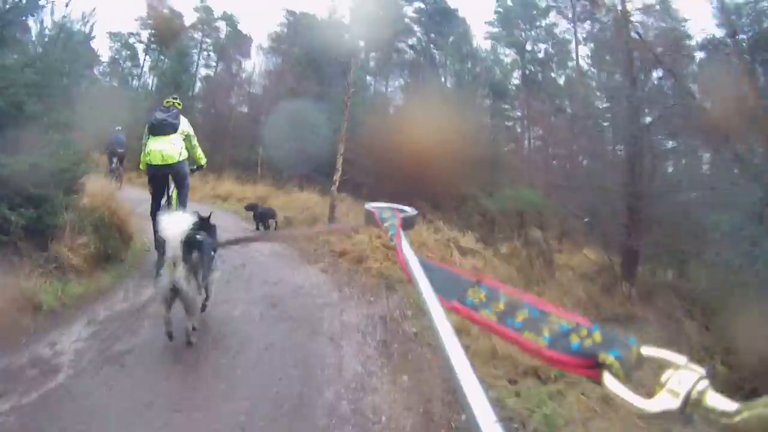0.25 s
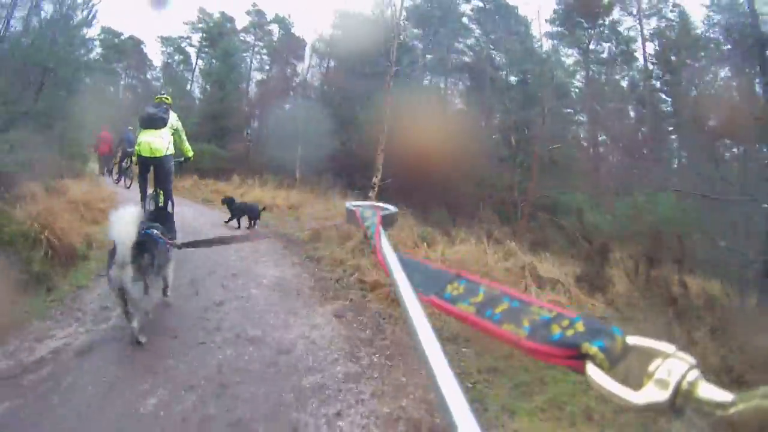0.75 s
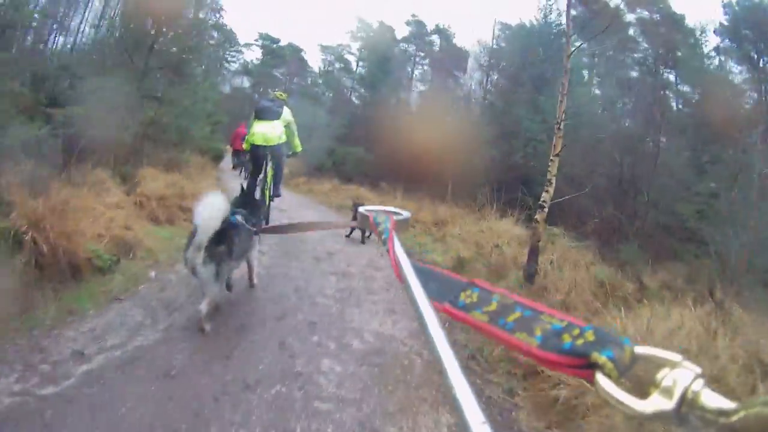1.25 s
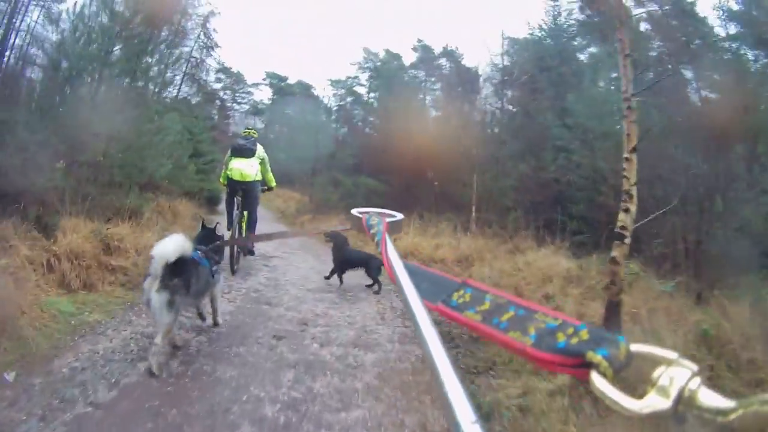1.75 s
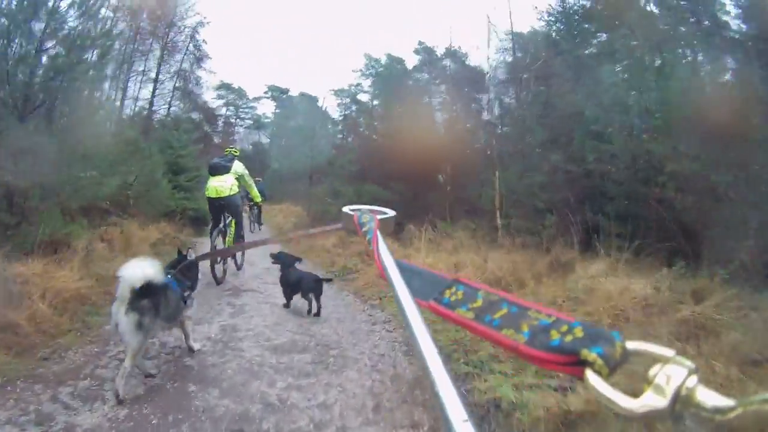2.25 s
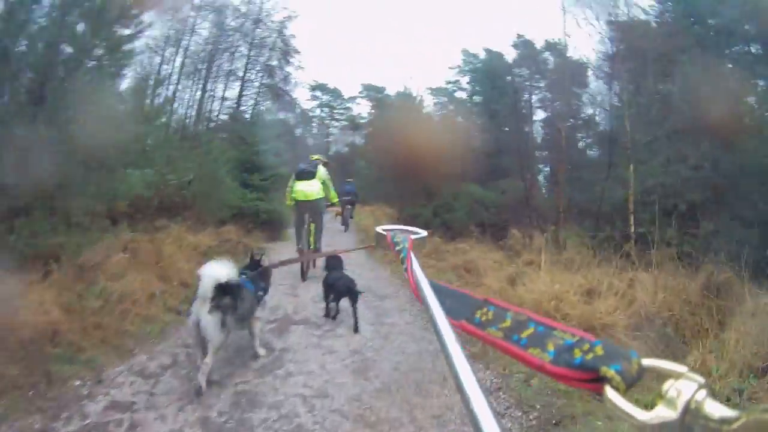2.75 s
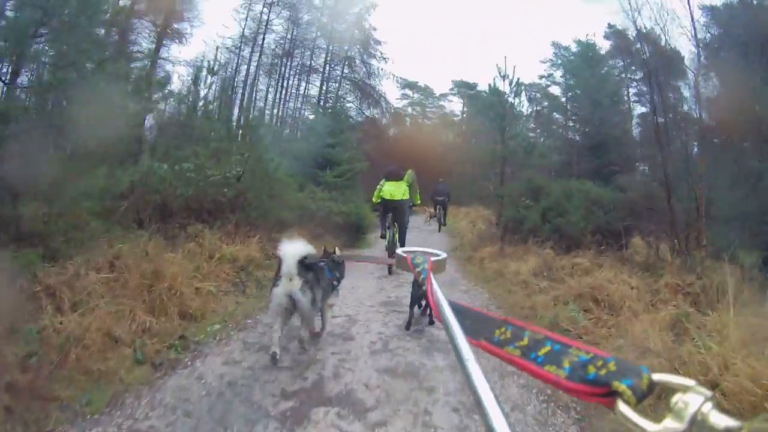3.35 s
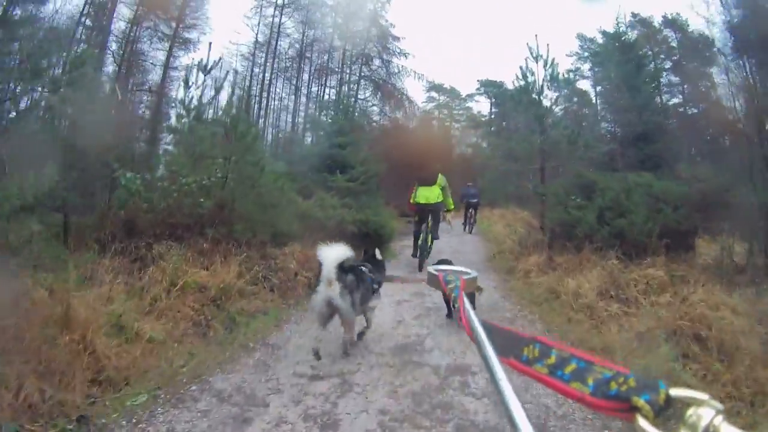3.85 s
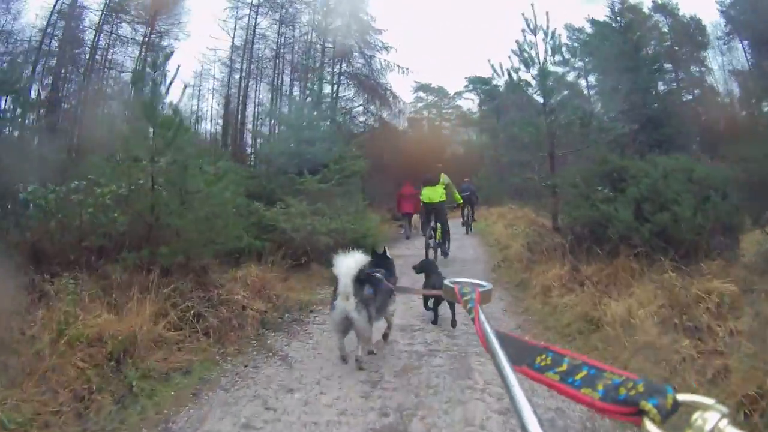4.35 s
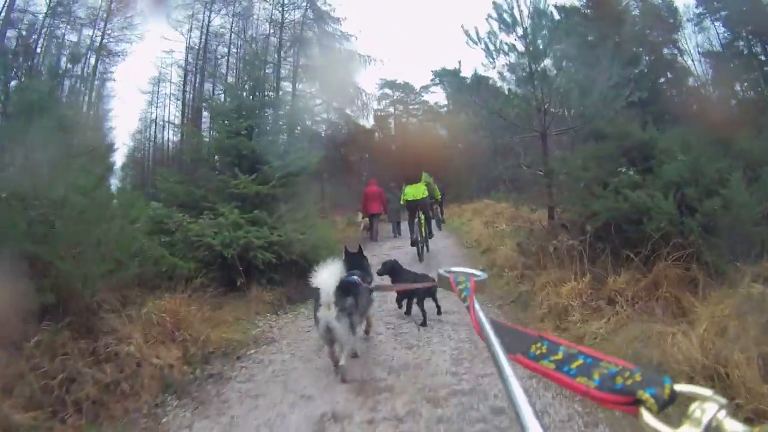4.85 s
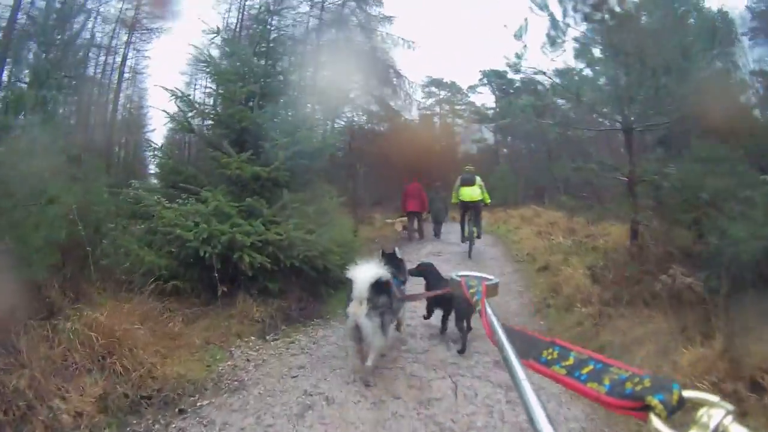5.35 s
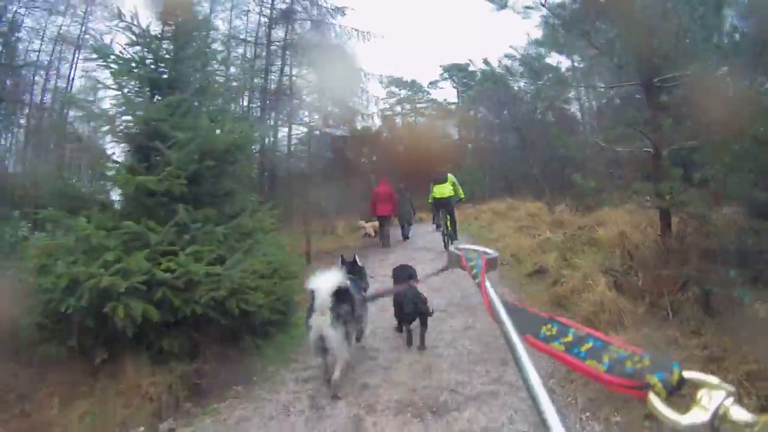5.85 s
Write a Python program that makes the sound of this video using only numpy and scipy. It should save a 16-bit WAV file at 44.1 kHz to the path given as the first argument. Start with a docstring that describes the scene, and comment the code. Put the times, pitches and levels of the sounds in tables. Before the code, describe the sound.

Bicycle tyres roll over a wet gravel forest track, crackling and hissing with sharp stone ticks above a low, unsteady clamp hum and frame rumble.

```python
"""Forest track of wet gravel, heard from a small camera clamped to a rolling bicycle. The clamp hums as an
oscillator of unsteady pitch; filtered noise shakes clamp and frame; noise bursts and damped grains crackle
and hiss under the tread. Stones tick, thud and tap as short impulses and damped swings, jolts ring the frame,
and the sharp ticks excite the bright resonance of the microphone port."""
import sys
import numpy as np
from scipy import signal
from scipy.fft import rfft, irfft, next_fast_len
from scipy.io import wavfile
from scipy.ndimage import uniform_filter1d, map_coordinates

SR = 44100
rng = np.random.default_rng(int(sys.argv[2]) if len(sys.argv) > 2 else 0)


def dump(signal):
    """Clip the signal to [-1, 1] and save it as 16-bit WAV at the path in sys.argv[1]."""
    limited = np.clip(np.atleast_2d(signal).T, -1, 1)
    pcm = np.round(limited * 32767).astype(np.int16)
    wavfile.write(sys.argv[1], SR, pcm)


N = 269010  # length [samples]

# Stone ticks: (time [s], peak of the bright ping [dB], peak of the dull knock [dB], knock pitch [Hz])
STONE_TICKS = [(0.0315, -23, -55, 2560), (0.0593, -19, -26.5, 3000), (0.1361, -9.5, -17, 3750),
               (0.1704, -17.5, -28, 3070), (0.1875, -20, -22, 2000), (0.2202, -53, -22.5, 2470),
               (0.3786, -30, -25.5, 3220), (0.475, -27, -37, 4400), (0.478, -7.5, -11, 4440),
               (0.4877, -43, -25, 1900), (0.494, -25, -29, 4000), (0.498, -7, -26, 2200),
               (0.5024, -33, -42, 3000), (0.5313, -6.5, -18.5, 3250), (0.547, -24, -28, 2940),
               (0.584, -25, -27, 1500), (0.621, -17.5, -27, 4720), (0.7378, -23, -25.5, 3670),
               (0.7692, -12, -20, 4100), (0.8339, -15, -24.5, 2770), (0.8452, -9.5, -19, 4530),
               (0.8995, -20, -30, 2740), (0.9156, -17.5, -29, 2200), (0.9728, -47, -23, 2880),
               (1.051, -8.5, -18.5, 3320), (1.063, -26, -20.5, 3230), (1.1022, -13.5, -20, 3030),
               (1.1327, -24, -26, 3040), (1.1403, -34, -28, 2550), (1.1873, -13, -21.5, 4300),
               (1.2475, -19.5, -29, 3300), (1.3074, -25, -22, 3200), (1.3428, -29, -14.5, 4570),
               (1.3593, -30, -24, 3030), (1.364, -22, -21.5, 3780), (1.379, -26, -32, 2310),
               (1.43, -16.5, -25, 3150), (1.4457, -21, -26, 3140), (1.512, -13.5, -20.5, 3520),
               (1.5796, -16.5, -18, 3320), (1.608, -45, -23, 2240), (1.6617, -36, -46, 3430),
               (1.6675, -11.5, -14, 2070), (1.6888, -28, -26, 4290), (1.727, -48, -22.5, 3900),
               (1.7964, -21.5, -32, 4160), (1.8181, -26, -33, 4350), (1.8568, -22.5, -28, 4000),
               (1.8614, -17.5, -17.5, 2920), (1.9644, -29, -32, 3920), (2.015, -29, -29, 2530),
               (2.036, -20.5, -31, 4060), (2.0676, -34, -26.5, 2990), (2.097, -22, -25.5, 4090),
               (2.109, -34, -23, 4100), (2.131, -19.5, -22, 3250), (2.213, -19, -24, 4350),
               (2.229, -12.5, -14, 4050), (2.2337, -25, -41, 2830), (2.2664, -10.5, -18, 1860),
               (2.327, -13, -20, 3460), (2.3797, -21.5, -25.5, 3670), (2.464, -26, -31, 4120),
               (2.489, -29, -27, 3800), (2.5098, -24, -33, 3470), (2.5354, -22.5, -16.5, 2650),
               (2.5476, -36, -27, 4260), (2.6017, -8, -14, 2900), (2.6466, -57, -32, 3500),
               (2.7669, -18.5, -27, 3950), (2.7791, -37, -31, 4870), (2.792, -17, -19, 3530),
               (2.8094, -49, -31, 4650), (2.825, -8.5, -15.5, 3800), (2.948, -22, -44, 3480),
               (3.0044, -34, -32, 3850), (3.0229, -23, -30, 2670), (3.158, -20, -25.5, 3800),
               (3.1935, -40, -34, 3130), (3.3255, -32, -43, 2900), (3.476, -25, -34, 4290),
               (3.513, -12.5, -18.5, 3770), (3.5615, -18.5, -28, 3680), (3.5985, -21, -24.5, 3070),
               (3.6523, -27, -34, 3190), (3.6656, -27, -36, 3370), (3.715, -27.5, -25.5, 3460),
               (3.738, -16.5, -25, 3980), (3.756, -21, -25, 3810), (3.7889, -17.5, -19.5, 2760),
               (3.8754, -40, -25.5, 1680), (3.8896, -10.5, -20, 4700), (3.9911, -34, -29.5, 3860),
               (4.0013, -30, -35, 3610), (4.1286, -11, -18.5, 4280), (4.214, -24.5, -33, 4000),
               (4.2472, -22, -32, 3900), (4.28, -19.5, -26, 4440), (4.3324, -44, -28, 3650),
               (4.3673, -28, -42, 3580), (4.374, -23, -24, 3600), (4.4418, -28.5, -47, 4430),
               (4.5574, -29, -52, 2020), (4.671, -19, -23, 4370), (4.704, -27, -28, 3930),
               (4.725, -23, -25.5, 2560), (4.7376, -25, -45, 3420), (4.768, -29, -32, 3160),
               (4.7818, -31, -27.5, 4030), (4.8787, -35, -28, 2490), (4.8843, -34, -29.5, 1452),
               (4.9129, -21.5, -32, 2630), (5.2295, -28, -24, 4630), (5.3347, -39, -32.5, 2240),
               (5.3705, -32, -26, 2940), (5.4293, -36, -27, 3580), (5.4716, -43, -26, 4030),
               (5.532, -25, -24.5, 4460), (5.6054, -7, -18, 2380), (5.672, -7.5, -16, 4100),
               (5.6878, -33, -34, 3380), (5.8237, -39, -23.5, 3700), (5.9208, -28, -25, 3500),
               (5.9408, -35, -31, 4180), (6.0244, -21, -24, 3320), (6.0324, -28, -20, 3180),
               (6.0944, -7.5, -21, 4900)]
# Modes of the bicycle frame: (frequency [Hz], width [Hz], relative level [dB])
FRAME_MODES = [(71.7, 16, -2), (115, 31, -6), (147, 16.6, -2), (233, 34.7, 1.5), (277, 77, -4),
               (325.5, 46.6, -9)]
# Modes of the camera case: (frequency [Hz], width [Hz], relative level [dB])
CASE_MODES = [(1429, 114, -2.5), (2197, 28, -5.5)]
# Amount and wetness of gravel under the tread: (time [s], relative crunch level [dB], relative hiss level [dB])
GRAVEL_LEVELS = [(0.0, -42.5, -34.5), (0.1, -49, -40), (0.27, -49, -41), (0.4, -52, -44),
                 (0.54, -42.5, -41), (0.66, -49.5, -43), (0.85, -46.5, -40), (1.03, -47, -41),
                 (1.6, -48.5, -41), (1.87, -51.5, -43.5), (2.11, -50, -44), (2.17, -51.5, -41.5),
                 (2.75, -54, -46.5), (3.11, -51, -44.5), (3.29, -54.5, -46), (3.53, -52, -46.5),
                 (3.7, -51.5, -46), (4.06, -52, -44), (4.31, -52.5, -47.5), (4.5, -53.5, -47.5),
                 (4.79, -52, -45), (4.93, -52.5, -46), (5.16, -54, -47.5), (5.45, -52.5, -45.5),
                 (5.88, -53.5, -46), (6.1, -48, -41.5)]


def amp(db):
    """Level to amplitude: 20 dB is a factor of ten."""
    return 10 ** (np.asarray(db) / 20)


def unit(x):
    """Power normalisation: x at rms 1."""
    return x / np.sqrt(np.mean(x ** 2) + 1e-20)


def along(points, hz):
    """Logarithmic frequency scale: (frequency [Hz], value) points interpolated on it."""
    f, v = np.transpose(points)
    return np.interp(np.log(hz + 1), np.log(f + 1), v)


def curves(rows):
    """Linear interpolation: one value per sample for each column after the time."""
    s, *columns = np.transpose(rows)
    return [np.interp(np.arange(N) / SR, s, column) for column in columns]


def wobble(rate):
    """Band-limited fluctuation: a smooth random curve with rate knots a second."""
    knots = rng.standard_normal(int(N * rate / SR) + 4)
    return map_coordinates(knots, [np.arange(N) * rate / SR])


def filtered(x, response):
    """Convolution theorem: the spectrum of x (last axis is time) times a complex response."""
    m = next_fast_len(2 * x.shape[-1])
    spectrum = rfft(x, m) * response(np.fft.rfftfreq(m, 1 / SR))
    return irfft(spectrum, m)[..., :x.shape[-1]]


def coloured(x, spectrum):
    """Spectral shaping: x through a (frequency [Hz], gain [dB]) curve, at rms 1."""
    return unit(filtered(x, lambda hz: amp(along(spectrum, hz))))


def resonances(modes):
    """Modal superposition: causal response of parallel (Hz, width, dB) modes of alternating sign."""
    def response(f):
        return sum((-1) ** k * amp(db) * 1j * f * width / (centre * centre - f * f + 1j * f * width)
                   for k, (centre, width, db) in enumerate(modes))
    return response


def grains(count, centre_hz, spread, cycles, size_db, bunching):
    """Granular impact noise: scattered damped sines of random pitch, a few larger than the rest."""
    start = (rng.random(count) * N).astype(int)
    hz = np.clip(centre_hz * np.exp(spread * rng.standard_normal(count)), 300, 13000)[:, None]
    size = amp(size_db * np.minimum(rng.exponential(size=count), 3.2)) * bunching[start]
    n = np.arange(500)
    turns = hz * n / SR
    envelope = np.exp(-turns / cycles) * (1 - np.exp(-turns / 0.62))
    shape = size[:, None] * np.sin(2 * np.pi * turns) * envelope
    return np.bincount((start[:, None] + n).ravel(), shape.ravel(), N + len(n))[:N]


def bursts(rate, decay_s):
    """Shot noise: a level that rises at random moments and sinks back; mean 0, spread 1."""
    jumps = (rng.random(N) < rate / SR) * rng.exponential(size=N)
    level = signal.fftconvolve(jumps, np.exp(-np.arange(SR // 4) / SR / decay_s))[:N]
    level = np.sqrt(np.abs(uniform_filter1d(level, size=SR // 250)))  # the rise takes a few ms
    return unit(level - level.mean())


def patchy(depth_db):
    """Time-frequency modulation: noise whose level differs between small patches of time and pitch."""
    z = signal.stft(rng.standard_normal(N), nperseg=256)[2]
    field = uniform_filter1d(rng.standard_normal(z.shape), size=4, axis=0)
    field = uniform_filter1d(field, size=8, axis=1)
    return signal.istft(z * amp(depth_db * unit(field)), nperseg=256)[1][:N]


def clamp():
    """Frequency-modulated oscillation with weak overtones; hard ticks fall shortly before the top of a swing.
    Returns where in the swing knocks are favoured (-1 to 1) and the sound."""
    # Main vibration of the clamp, before its wobble: (time [s], pitch [Hz])
    hum_pitch = [(0, 56.9), (.4, 56.4), (.7, 61.44), (1.6, 59.7), (1.8, 53.4), (2.4, 55.7), (2.7, 59.7),
                 (4.25, 58.25), (4.4, 55.9), (5.5, 59.77), (6.1, 55)]
    # Strength of the swing, before its wobble and smoothing: (time [s], level [dB])
    hum_level = [(0.0, -27), (0.22, -35), (0.29, -39), (0.59, -26), (0.71, -41.5), (0.93, -24.5),
                 (1.02, -38), (1.54, -29.5), (1.85, -41.5), (2.38, -31), (2.46, -39), (2.6, -30),
                 (2.65, -39), (2.99, -33.5), (3.48, -42), (3.53, -31.5), (3.92, -27), (3.99, -56),
                 (4.15, -28), (4.38, -38), (4.89, -30), (4.99, -39.5), (5.76, -33.5), (5.88, -41),
                 (6.0, -32), (6.1, -31.5)]
    (hz,), (level_db,) = curves(hum_pitch), curves(hum_level)
    phase = 2 * np.pi * np.cumsum(hz + 2.42 * wobble(10)) / SR
    hard = np.array([round(s * SR) for s, ping_db, *_ in STONE_TICKS if ping_db > -16.5])
    lead = np.pi / 3
    # slide the phase so that it sits one lead before the top at the hard ticks
    drift = np.interp(np.arange(N), hard, np.unwrap(phase[hard] + lead))
    phase = phase - uniform_filter1d(uniform_filter1d(drift, size=SR // 20), size=SR // 20)
    size = uniform_filter1d(amp(level_db + 1.25 * wobble(7.3)), size=SR // 30)  # a resonance cannot jump
    overtones = amp(-23.0) * np.cos(2 * phase) + amp(-25.5) * np.cos(4 * phase)
    return np.cos(phase + lead), np.sqrt(2) * size * (np.cos(phase) + overtones)


def shaking():
    """Random forced vibration: bumps shudder the clamp and excite the modes of the frame."""
    # Roughness of the track: (time [s], level of the shudder before its wobble [dB])
    roughness = [(0.0, -25), (0.7, -33), (0.83, -27.5), (0.93, -32.5), (1.12, -23), (1.48, -38),
                 (1.49, -31), (2.62, -31), (2.65, -38.5), (4.04, -31.5), (4.6, -40.5), (4.76, -28),
                 (4.79, -36.5), (6.1, -33.5)]
    # Colour of the shudder: (frequency [Hz], gain [dB])
    shudder_colour = [(9, -15), (15, 1.5), (35, 0), (46, -5.5), (62, -4), (70, -6.5), (90, -49.5)]
    (shudder_db,), (gravel_db, _) = curves(roughness), curves(GRAVEL_LEVELS)
    frame_db = -44.5 + 0.1 * (shudder_db - shudder_db.mean())  # mean level; dB gained per dB of roughness
    frame_db = frame_db + 0.46 * (gravel_db - gravel_db.mean())  # dB gained per dB of gravel
    shudder = amp(shudder_db + 2.16 * wobble(6.8)) * coloured(rng.standard_normal(N), shudder_colour)
    push = rng.standard_normal(N) * amp(0.75 * wobble(16))
    frame = unit(filtered(push, lambda f: resonances(FRAME_MODES)(f) / (1 + (f / 340) ** 8)))
    return shudder + amp(frame_db) * frame


def tread(swing):
    """Common modulation: crunch and hiss share their bursts, and grains strike harder on the upswing."""
    burst_db = 1.59 * bursts(rate=110, decay_s=0.0067)
    strike = amp(burst_db + 3.6 * swing)
    return crunch(swing, burst_db, strike) + hiss(swing, burst_db, strike)


def crunch(swing, burst_db, strike):
    """Granular friction: shaped noise and damped grains of grit, with a lower grind of larger stones."""
    # The tread crushes a clump of gravel: (time [s], swell of the crunch [dB])
    clumps = [(0.19, 12.5), (0.498, 7.5), (0.542, 3.5), (0.91, 7), (1.045, 8), (1.139, 9), (1.25, 2),
              (1.37, 5.5), (1.586, 10), (2.27, 7), (3.03, 5), (3.9, 10.5), (4.37, 4), (4.77, 4),
              (5.97, 4.5)]
    # Colour of the crunch: (frequency [Hz], gain [dB])
    crunch_colour = [(200, -37), (330, 5), (420, 1), (800, -2.5), (1150, -4), (1450, 1.5), (1850, -0.5),
                     (2250, 1.5), (2550, -3.5), (4500, -3), (7000, -27), (12000, -60)]
    # Colour of the grind of larger stones: (frequency [Hz], gain [dB])
    grind_colour = [(250, -22), (380, 0), (700, -6), (1100, 0), (1600, -24)]
    t = np.arange(N) / SR
    clump_db = sum(db * np.exp(-((t - s) / 0.0098) ** 2) for s, db in clumps)
    crunch_db = curves(GRAVEL_LEVELS)[0] + clump_db
    grit = grains(count=2500, centre_hz=2250, spread=0.558, cycles=1.1, size_db=1.5, bunching=strike)
    bed_db = 1.64 * burst_db + 1.5 * bursts(rate=39, decay_s=0.012) + 0.35 * swing
    bed = patchy(depth_db=2.0) * amp(bed_db)
    gritty = amp(-6.5 + 0.073 * clump_db) * unit(grit)  # a clump is grittier
    crackle = amp(crunch_db - 0.4) * (coloured(bed, crunch_colour) + gritty)
    grind_db = -63 + 1.3 * (crunch_db - crunch_db.mean())  # mean level; dB gained per dB of crunch
    return crackle + amp(grind_db) * coloured(bed[::-1], grind_colour)  # the bed reversed in time


def hiss(swing, burst_db, strike):
    """Superposed microscopic impacts: bursts of spray noise, tiny damped specks and broadband clicks."""
    # Colour of spray and snaps: (frequency [Hz], gain [dB])
    hiss_colour = [(3000, -15), (5200, -7.5), (6000, -2), (6900, -1), (8000, 3), (9500, -4), (11500, -15.5),
                   (13500, -21), (14100, -38), (14400, -58)]
    hiss_db = curves(GRAVEL_LEVELS)[1]
    specks = grains(count=4500, centre_hz=7760, spread=0.248, cycles=2.3, size_db=3.5, bunching=strike)
    spray_db = 1.24 * burst_db + 0.65 * bursts(rate=210, decay_s=0.0016) + 0.24 * swing
    spray = patchy(depth_db=1.5) * amp(spray_db)
    snaps = (rng.random(N) < 350 / SR) * rng.laplace(size=N) * strike  # tiny stones crack: dry, broad clicks
    mixed = coloured(spray, hiss_colour) + amp(-7.0) * unit(specks) + amp(-6.5) * coloured(snaps, hiss_colour)
    return amp(hiss_db - 1.74) * mixed


def ticks():
    """Impact excitation: brief contact chatter pings the port; a blow and its rebound, of random strength and
    sign, give a short knock through the stone's own resonance and the case modes."""
    # Port resonances that a tick excites: (frequency [Hz], width [Hz], relative level [dB])
    port_modes = [(5300, 2000, -14), (8200, 900, 0), (10800, 2500, -9), (13200, 2500, -12)]
    rows = np.vstack([STONE_TICKS, small_stones(count=90)])
    s, ping_db, knock_db, hz = rows.T[:, :, None]
    t = np.arange(900) / SR
    chatter, scatter = np.moveaxis(rng.standard_normal((len(s), 2, len(t))), 1, 0)
    wait, again, *ring = rng.random((len(s), 4)).T[:, :, None]

    def at_peak(x, db):
        return amp(db) * x / np.abs(x).max(axis=1, keepdims=True)

    def touch(at_s):
        return np.exp(-((t - at_s) / 0.00004) ** 2)

    def stone(f):  # broad, around its pitch
        return 1j * f * hz * 1.82 / (hz * hz - f * f + 1j * f * hz * 1.27)

    press = (1 - np.exp(-t / 0.00019)) * amp(-60 * (t / 0.0012) ** 2)  # the contact builds and lets go
    rattle = np.sin(2 * np.pi * (8200 + 500 * (wait - .5)) * t)  # the port's own pitch rules the chatter
    contact = (0.54 * rattle + chatter) * press + chatter * amp(-15 - 60 * t / 0.0091)
    ping = filtered(contact, lambda f: resonances(port_modes)(f) * resonances([(8400, 8000, 0)])(f))
    rebound = 1.04 * (again - .5) * touch(0.00042 + 0.00065 * wait)
    blow = touch(0.00021) + rebound + scatter * amp(-13 - 60 * t / 0.017)
    # a duller stone rings the case modes more
    struck = [(c, w, db + 3.8 * r - 3.3 * np.log2(hz / c)) for (c, w, db), r in zip(CASE_MODES, ring)]
    knock = filtered(blow, lambda f: (stone(f) ** 2 + resonances(struck)(f)) / (1 + (f / 7000) ** 4))
    sound = at_peak(ping, ping_db) + at_peak(knock, knock_db)
    at = np.round(s * SR).astype(int) + np.arange(len(t))
    return np.bincount(at.ravel(), sound.ravel(), N + len(t))[:N]


def small_stones(count):
    """Random impact statistics: rows like the stone ticks, at random times, louder where gravel is thick."""
    typical_ping_db, typical_knock_db, scatter_db = -38, -38.5, 3.5
    typical_hz, log_spread = 2920, 0.55
    gravel_db, _ = curves(GRAVEL_LEVELS)
    s = rng.random(count) * (N - 1) / SR
    ping, knock, pitch = rng.standard_normal((count, 3)).T
    more_db = gravel_db[(s * SR).astype(int)] - gravel_db.mean()
    ping_db = typical_ping_db + more_db + scatter_db * ping
    knock_db = typical_knock_db + more_db + scatter_db * knock
    hz = np.clip(typical_hz * np.exp(log_spread * pitch), 800, 5500)
    return np.transpose([s, ping_db, knock_db, hz])


def jolts():
    """Impulse response of a modal body: larger stones push softly for 1.8 ms and the frame rings."""
    # Jolts of larger stones: (time [s], peak before a 0.5 dB cut [dB])
    stone_jolts = [(0.071, -29), (0.327, -30), (0.533, -30), (1.106, -28.5), (1.428, -30), (1.577, -23.5),
                   (4.977, -39)]
    t = np.arange(SR // 10) / SR
    push = np.sin(np.pi * np.minimum(t / 0.0018, 1)) ** 2
    ring = filtered(push, resonances(FRAME_MODES))
    sound = np.zeros(N + len(t))
    for s, db in stone_jolts:
        sound[round(s * SR):][:len(t)] += amp(db - 0.5) * ring / np.abs(ring).max()
    return sound[:N]


def thuds():
    """Heavily damped oscillation: heavy stones on the case give a dip, a swing back and a quick fade."""
    # Thuds of heavy stones: (time half a cycle after the start [s], pitch [Hz], peak [dB])
    heavy_thuds = [(0.1858, 915, -24), (0.4878, 990, -21), (0.4982, 905, -27), (0.532, 695, -36),
                   (1.0515, 1100, -28), (1.1405, 805, -28), (1.2483, 870, -22.5), (1.5808, 605, -31),
                   (1.6672, 1000, -25.5), (2.2658, 950, -28), (2.5352, 990, -29), (2.6016, 1110, -33),
                   (5.6056, 695, -29), (5.672, 600, -33.5)]
    sound = np.zeros(N)
    for s, hz, db in heavy_thuds:
        turns = hz * np.arange(400) / SR
        swing = -np.sin(2 * np.pi * turns) * turns * np.exp(-turns / 0.3)
        sound[round((s - .5 / hz) * SR):][:len(turns)] += amp(db) * swing / np.abs(swing).max()
    return sound


def taps():
    """Damped free vibration: short pitched taps on the case, and fainter random ones near its modes."""
    # Taps on the camera case: (time [s], pitch [Hz], relative level [dB])
    case_taps = [(0.1872, 2140, -25), (0.1905, 1530, -38), (0.459, 1790, -35), (0.657, 1780, -30.5),
                 (0.8203, 955, -32.5), (0.909, 1870, -37), (1.082, 1430, -32), (1.142, 855, -36),
                 (1.9258, 1430, -38), (2.3457, 1480, -39), (2.3602, 2260, -38), (3.028, 1690, -39),
                 (3.1287, 2120, -40), (3.8273, 1490, -35), (3.8822, 1950, -33), (3.8976, 2250, -41),
                 (3.908, 1350, -35), (3.9241, 1540, -38), (4.2879, 1150, -37.5), (4.554, 1450, -35.5),
                 (4.7136, 2230, -42), (4.7669, 2310, -35.5), (4.849, 1615, -36), (4.91, 1460, -36),
                 (4.9778, 1450, -40), (5.238, 1790, -41), (5.826, 1450, -38), (5.967, 1440, -33)]
    t = np.arange(600) / SR
    sound = np.zeros(N + len(t))
    for s, hz, db in case_taps:
        scrape = uniform_filter1d(rng.standard_normal(len(t)), size=40)
        rough = amp(3.1 * unit(scrape))  # the stone scrapes as it lands
        envelope = amp(db + 5.5 - 60 * t / 0.013) * (1 - np.exp(-t / 0.00085))
        sound[round(s * SR):][:len(t)] += envelope * np.sin(2 * np.pi * hz * t) * rough
    faint = [grains(count=200, centre_hz=hz, spread=0.04, cycles=1.5, size_db=4.0, bunching=np.ones(N))
             for hz, _, _ in CASE_MODES]
    return sound[:N] + amp(-69.5) * unit(sum(faint))


def scene():
    """Linear superposition: every source adds at one microphone."""
    swing, hum = clamp()
    return (hum + shaking() + tread(swing) + ticks() + jolts() + thuds() + taps())[None]


def record(dry):
    """Saturation and band limiting: peaks round off near full scale, and the treble falls off to a cutoff."""
    # Top end of the whole sound: (frequency [Hz], gain [dB])
    rolloff = [(13900, 0), (14200, -12), (14800, -18), (15200, -34)]
    full_scale, top_hz = 0.5, 15200  # ceiling of the amplitude; cutoff [Hz]
    held = dry / (1 + (dry / full_scale) ** 4) ** (1 / 4)
    return filtered(held, lambda hz: amp(along(rolloff, hz)) * (hz < top_hz))


dry = scene()
out = record(dry)
dump(out)
```